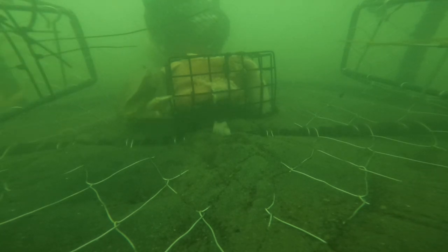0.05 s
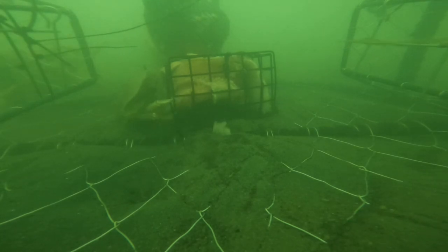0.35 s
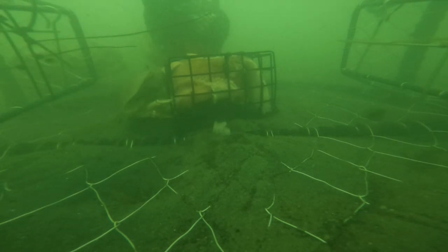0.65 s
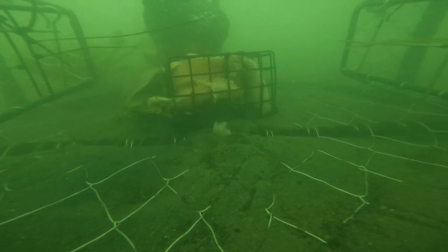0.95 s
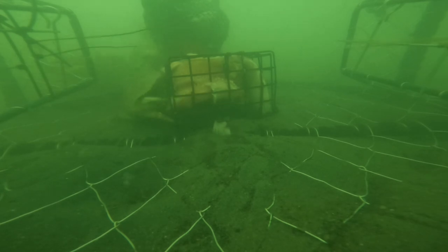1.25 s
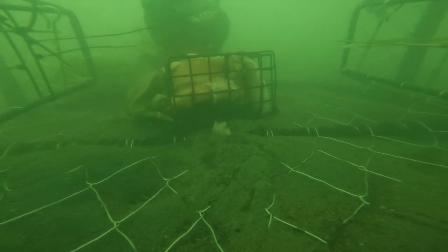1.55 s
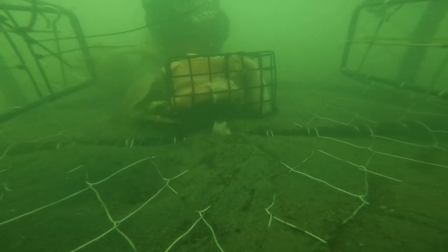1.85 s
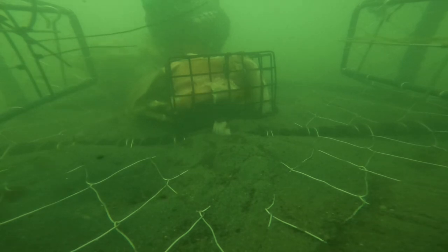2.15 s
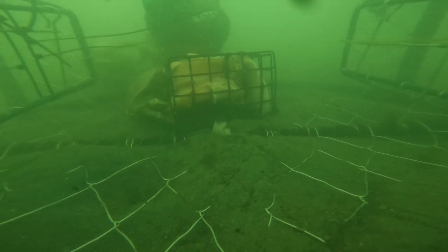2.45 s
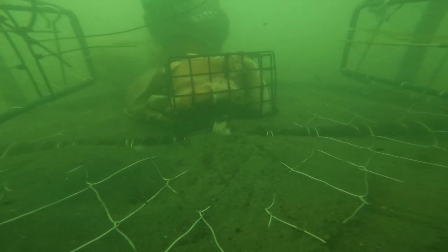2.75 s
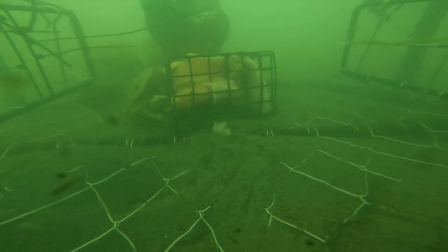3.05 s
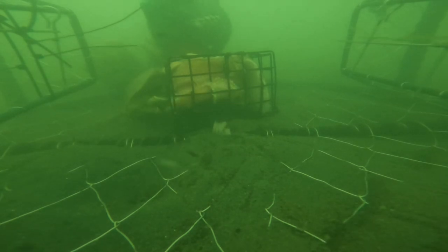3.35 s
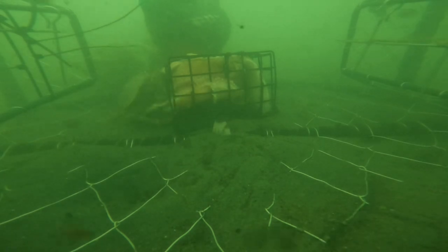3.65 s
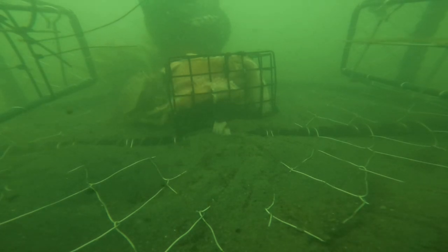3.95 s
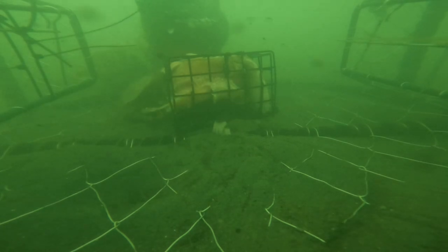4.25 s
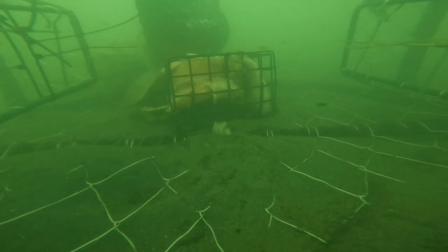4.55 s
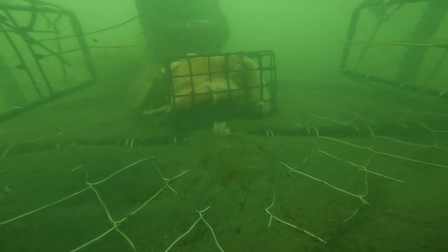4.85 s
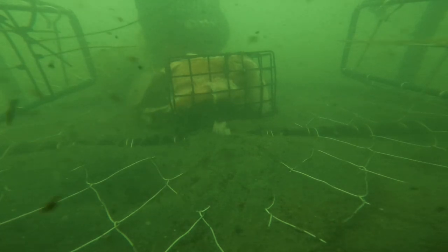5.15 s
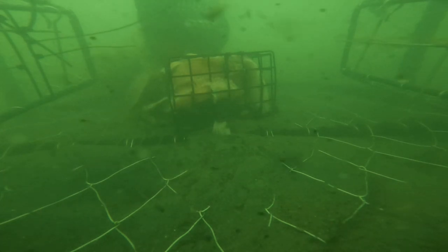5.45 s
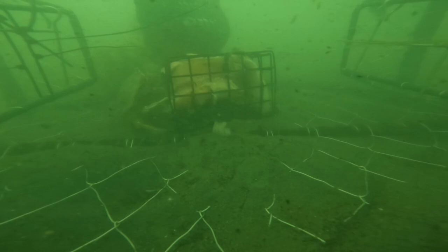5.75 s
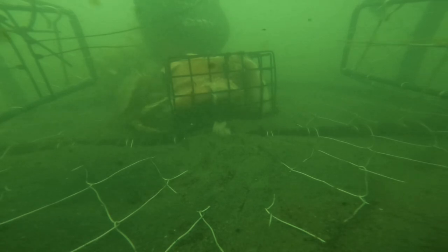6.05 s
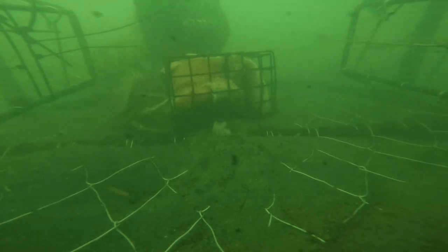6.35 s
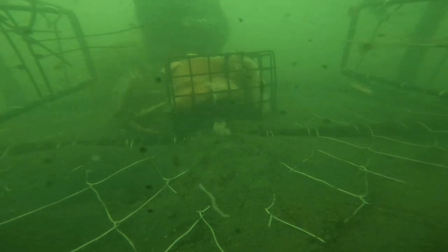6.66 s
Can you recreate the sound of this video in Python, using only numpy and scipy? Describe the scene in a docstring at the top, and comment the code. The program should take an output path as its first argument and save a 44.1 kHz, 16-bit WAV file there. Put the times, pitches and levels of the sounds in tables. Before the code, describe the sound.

A high, buzzing motor whine comes through a submerged case, with brief rasps, faint scrapes on a wire trap and muffled water.

```python
"""A small motor whines through a watertight case; three times it slows, twice with a rasp.
The case holds a camera, on the seabed inside a baited wire trap; the motor is probably its own.
The turning shaft rubs, buzzes and squeals, and the case's resonances colour the whine.
Faint knocks and scrapes on the trap ring the case, over the dull wash of moving water.
Near the end the sound stutters for an instant."""
import sys
import numpy as np
from scipy import signal
from scipy.fft import rfft, irfft, next_fast_len
from scipy.io import wavfile

SR = 44100
rng = np.random.default_rng(int(sys.argv[2]) if len(sys.argv) > 2 else 0)


def master(y):
    """Save y as 16-bit WAV."""
    cut = np.clip(np.atleast_2d(y).T, -1, 1)
    pcm = np.round(cut * 32767)  # scale
    wavfile.write(sys.argv[1], SR, pcm.astype(np.int16))


N = 304731
TIME = np.arange(N) / SR
HZ = np.fft.rfftfreq(next_fast_len(N), 1 / SR)
POLE_COUNT, CHIRPS_PER_TURN = 6, 3
STUTTER_START_S, STUTTER_END_S = 6.74, 6.7572
TREBLE_EDGE_HZ = 12900


def amp(db):
    """Decibels to gain."""
    return 10 ** (np.asarray(db) / 20)


def unit_rms(x):
    """The signal scaled to rms 1."""
    return x / np.sqrt(np.mean(x ** 2) + 1e-20)


def eq_curve(points):
    """Gain at every frequency, from points of (frequency [Hz], level [dB])."""
    hz, db = np.transpose(points)
    return amp(np.interp(np.log(HZ + 1), np.log(hz), db))


def coloured(x, gain):
    """The signal filtered by a gain curve, at rms 1."""
    size = next_fast_len(N)
    return unit_rms(irfft(rfft(x, size) * gain, size)[:N])


def drift(rate_hz, size=4096):
    """A smooth random wobble up to about the given rate, at rms 1."""
    hz = np.fft.rfftfreq(size, TIME[-1] / size)
    slow = irfft(rfft(rng.standard_normal(size)) / (1 + (hz / rate_hz) ** 4))
    return np.interp(TIME, np.linspace(0, TIME[-1], size), unit_rms(slow))


def add(mix, start_s, sound):
    """Mixes a sound in at a time."""
    part = mix[max(round(start_s * SR), 0):][:len(sound)]
    part += sound[:len(part)]


def held(start, end, attack_s, release_s):
    """An envelope that rises from the start, holds at 1, and falls from the end."""
    return np.clip(np.minimum((TIME - start) / attack_s, 1 - (TIME - end) / release_s), 0, 1)


def after_stutter(rise_s=0.022):
    """0 before the stutter, 1 after."""
    return np.clip((TIME - STUTTER_END_S) / rise_s, 0, 1)


def stir():
    """The stir around the trap, in dB about its mean: water, grit and taps swell with it."""
    # strength of the small touches: (time [s], level [dB])
    activity = [(0.0, -38.5), (0.15, -40.5), (0.75, -47), (1.21, -41.5), (1.63, -49), (1.86, -42.5),
                (2.25, -47.5), (3.19, -44), (3.5, -47), (3.92, -45), (4.48, -50), (4.61, -40.5),
                (5.36, -45.5), (5.63, -44), (6.03, -50), (6.9, -40.5)]
    db = np.interp(TIME, *np.transpose(activity))
    return db - db.mean()


def water(level_db=-44, lumps_db=3, stir_depth=0.62):
    """Moving water: a dull, lumpy wash that grows with the stir, and a few low surges."""
    # tone of the wash: (frequency [Hz], level [dB])
    wash_eq = [(20, 3), (60, -5), (110, 5), (160, -10), (215, 3), (270, -20), (330, 14.5), (450, -17),
               (580, -3.5), (850, -4), (1120, -5), (1450, -8), (3000, -5), (8000, -15)]
    # surges of water on the case: (peak time [s], length [s], level [dB])
    surges = [(0.982, 0.022, -38), (1.815, 0.3, -53), (2.35, .28, -60), (2.75, 0.042, -44),
              (3.506, .099, -42.5), (6.8, .09, -41.5)]
    lumps = amp(lumps_db * drift(12) + stir_depth * stir())
    wash = amp(level_db) * coloured(rng.standard_normal(N) * lumps, eq_curve(wash_eq))
    swell = sum(amp(db) * np.exp(-(2 * (TIME - peak) / length) ** 2) for peak, length, db in surges)
    rumble_gain = eq_curve([(15, -14), (40, -2), (130, -7), (300, -10), (900, -58)])
    return wash + swell * coloured(rng.standard_normal(N), rumble_gain)


def trap_ring(band, size=2400, place_db=1.5, detune_hz=11, rise_s=0.00076, low_cut_hz=175):
    """One band of the trap's modes rings out; their mix and pitch depend on the place touched."""
    # trap modes: (frequency [Hz], t60 [s], level [dB], band [0 thump, 1 knock, 2 tick])
    modes = [(195, 0.024, -4, 0), (224, 0.05, -1, 0), (287.6, 0.042, -0.5, 0), (319, 0.08, 0.5, 0),
             (572, 0.037, -3.5, 1), (742, 0.024, -0.5, 1), (1063, 0.018, 6.5, 1), (1188, 0.021, 3, 1),
             (1512, 0.019, -2, 1), (1960, 0.022, -3.5, 1), (3100, 0.0042, -5.5, 2), (3744, 0.017, -7.5, 2),
             (3960, 0.015, -5, 2), (4660, 0.0082, 1.5, 2), (4880, 0.012, 2, 2), (7820, 0.0048, 0.5, 2)]
    t, ring = np.arange(size) / SR, np.zeros(size)
    place = rng.standard_normal((len(modes), 3))
    for (hz, t60, db, mode_band), (weight, detune, polarity) in zip(modes, place):
        if round(mode_band) == band:
            decay = amp(db + place_db * weight - 60 * t / t60)
            ring += decay * np.sin(2 * np.pi * (hz + detune_hz * detune) * t) * np.sign(polarity)
    attack = 1 - np.exp(-t / rise_s)
    # the rings carry no deep bass
    return signal.lfilter(*signal.butter(3, low_cut_hz, "high", fs=SR), ring * attack)


def grit(per_s=180, spread_db=3, levels_db=(-47, -49, -44), stir_depth=0.86, place_count=12, size=4000):
    """Many tiny touches of sand and wire ring the trap at a dozen places."""
    times = np.cumsum(rng.exponential(1, size)) / per_s
    stir_db, out = stir_depth * np.interp(times, TIME, stir()), np.zeros(N)
    for band, db in enumerate(levels_db):
        places, layer = [trap_ring(band) for _ in range(place_count)], np.zeros(N)
        blows = amp(stir_db + spread_db * np.minimum(rng.exponential(1, size), 3))
        for k, start in enumerate(times[times < TIME[-1]]):
            add(layer, start, blows[k] * places[k % place_count])
        out += amp(db) * unit_rms(layer)
    return out


def contact(length_s, levels_db, scrape=0.28, lags_s=(.002, .0007, 0)):
    """A blow and a short gritty slide on the trap; the lower bands answer a little later."""
    progress, out = np.arange(SR // 10) / (length_s * SR), np.zeros(SR // 5)
    for band, (db, lag) in enumerate(zip(levels_db, lags_s)):
        force = scrape * rng.standard_normal(len(progress)) * np.exp(-2 * progress ** 2)
        force[0] += 1  # the blow
        sound = signal.fftconvolve(force, trap_ring(band))
        sound /= np.sqrt(np.sum(sound ** 2) / (SR / 100))  # the energy of 10 ms at rms 1
        add(out, lag, amp(db) * sound)
    return out


def taps(count=64, length_s=0.005, levels_db=(-43, -44, -35), spread_db=4, stir_depth=0.93):
    """Light contacts with the trap at random moments, harder when there is more stir."""
    out, stir_db = np.zeros(N), stir()
    for k in range(count):
        at = int((k + rng.random()) * N / count)
        strength_db = stir_depth * stir_db[at] + spread_db * (2 * rng.random(len(levels_db)) - 0.5)
        add(out, at / SR, contact(length_s, np.add(levels_db, strength_db)))
    return out


def knocks():
    """The clear contacts with the trap: short ones knock, long ones scrape."""
    # hits on the trap: (time [s], length [s], thump [dB], knock [dB], tick [dB])
    hits = [(0.065, 0.0087, -28, -40, -47), (0.19, 0.041, -32.5, -27, -17.5),
            (0.284, 0.0091, -46, -28.5, -26), (.38, 0.011, -31.5, -27, -25.5), (.468, 0.01, -50, -33, -28),
            (0.684, 0.093, -27, -28, -22), (0.809, 0.038, -29, -35, -40), (1.413, 0.066, -37, -31.5, -37),
            (1.609, 0.054, -29.5, -28.5, -26), (1.805, .0027, -54, -54, -27), (1.885, 0.017, -35, -39, -27),
            (1.932, 0.016, -40, -33.5, -33), (1.976, 0.0045, -34, -37.5, -28.5),
            (2.488, 0.0018, -62, -45, -28), (2.571, 0.023, -33.5, -35, -25.5),
            (2.675, 0.0058, -40, -36.5, -41), (2.883, 0.0085, -60, -37, -26),
            (2.92, 0.0034, -52, -36, -23.5), (2.987, 0.0051, -47, -32.5, -22.5),
            (3.066, 0.0012, -39, -31, -22), (3.114, .0022, -50, -34.5, -34),
            (3.241, .0022, -35, -31.5, -21), (3.316, 0.00089, -34, -34, -24), (3.356, .0016, -36, -40, -27),
            (3.902, 0.0084, -34.5, -34.5, -26), (3.98, 0.01, -40, -39.5, -25.5),
            (4.048, .0025, -46, -41, -26), (4.104, 0.012, -27, -30.5, -29.5),
            (4.177, 0.024, -33.5, -35, -28), (4.21, 0.0013, -50, -43, -24.5), (4.268, 0.016, -31, -46, -30),
            (4.29, 0.0083, -25, -34, -20.5), (4.401, 0.024, -23.5, -34.5, -26.5),
            (4.462, 0.019, -26, -31, -18.5), (4.549, 0.00089, -48, -32.5, -35),
            (4.592, 0.071, -34, -30, -25), (4.677, 0.026, -25.5, -29.5, -21.5),
            (5.245, 0.0057, -38, -24, -25.5), (5.38, 0.0025, -37.5, -49, -28.5),
            (5.399, 0.0066, -53, -40, -26), (5.492, 0.0026, -35.5, -43, -24.5),
            (5.617, 0.098, -34, -32.5, -26), (6.216, 0.054, -27, -29, -23), (6.373, 0.011, -29.5, -41, -22),
            (6.663, 0.0028, -45, -31.5, -25), (6.694, 0.021, -44, -37, -31),
            (6.884, 0.0039, -51, -32.5, -27)]
    out = np.zeros(N)
    for start, length, *levels_db in hits:
        add(out, start, contact(length, levels_db))
    return out


def camera_tones(waver_db=4.5, wander_hz=3):
    """The camera's thin tones, wavering together in pitch and level."""
    # steady tones: (frequency [Hz], level [dB])
    tones = [(4420, -47.5), (4544, -52.5), (4608, -53), (4883, -46), (7029, -42), (8409, -67)]
    wander = np.cumsum(wander_hz * drift(7.94)) / SR
    sines = sum(amp(db) * np.cos(2 * np.pi * (hz * TIME + wander + rng.random())) for hz, db in tones)
    return np.sqrt(2) * sines * amp(waver_db * drift(3.5))


def shaft(free_hz=34.41, late_sag_hz=.17, brake_s=.09, release_s=.07, creep_s=.42, creep_share=.09):
    """Speed [turns/s] and load [0-1]: each load brakes the shaft, holds it and lets it go."""
    # the motor takes up a load: (start [s], end [s], speed lost [turns/s])
    slowdowns = [(.36, .9, 2.6), (2.47, 2.74, 3.3), (4.71, 5.11, 2.7)]
    speed, load = free_hz - late_sag_hz * after_stutter(), np.zeros(N)
    for start, end, sag in slowdowns:
        grip = held(start, end, brake_s, release_s)
        # the last of the lost speed creeps back slowly
        creep = np.clip((TIME - start) / brake_s, 0, 1) * np.exp(-np.maximum(TIME - end, 0) / creep_s)
        drag = (1 - creep_share) * grip + creep_share * creep
        speed, load = speed - sag * drag, load + drag
    return speed, load


def buzz(turns, load, waver_db=0.82, loaded_db=-13, late_order=60, late_db=7):
    """Clean overtones of the shaft; they fade under load, and one grows after the stutter."""
    # overtones: (order [multiple of the shaft speed], level [dB])
    overtones = [(36, -58), (42, -58.5), (48, -61.5), (54, -53), (60, -52), (66, -75), (72, -48), (78, -57),
                 (84, -56.5), (90, -53.5), (96, -80), (102, -67), (108, -53.5), (144, -52.5), (150, -80),
                 (167, -42), (171, -62), (174, -45.5), (180, -34), (186, -55), (192, -32.5), (210, -56)]
    out, lift_db = np.zeros(N), late_db * after_stutter()
    for order, db in overtones:
        level = amp(db + waver_db * drift(7.4) + lift_db * (round(order) == late_order))
        out += level * np.cos(2 * np.pi * (round(order) * turns + rng.random()))
    return np.sqrt(2) * out * amp(loaded_db * load)


def rasp_envelope(start, length, db, attack_s=0.025, release_s=0.027, swell_db=1.5,
                  catch_db=8, catch_s=.012):
    """A rasp catches hard at its start and swells towards its middle."""
    age = np.maximum(TIME - start, 0)
    catch = np.exp(-(age / catch_s - 1) ** 2)
    arch = np.sin(np.pi * np.minimum(age / length, 1))
    return amp(db + catch_db * catch + swell_db * arch) * held(start, start + length, attack_s, release_s)


def rasp(turns, hiss_db=-29, ring_db=-39, width_hz=950, decay_steps=0.99, uneven_db=3):
    """The loaded drive rasps: noise pulses at every pole step and rings a sliding resonance."""
    # rasps: (start [s], length [s], level [dB], first resonance [Hz], last resonance [Hz])
    rasps = [(0.442, 0.476, -1.5, 1820, 1880), (4.826, 0.314, -3.5, 2250, 1630)]
    # tone of their hiss: (frequency [Hz], level [dB])
    hiss_eq = [(500, -19), (1200, -16.5), (2000, -5.5), (2400, -1.5), (2900, -9), (3400, -4.5),
               (4000, -7.5), (5200, 4), (6000, -7), (8000, -7), (10000, -16.5), (13000, -31)]
    envelope = sum(rasp_envelope(start, length, db) for start, length, db, _, _ in rasps)
    step_phase = (POLE_COUNT * turns + 0.17 * drift(81)) % 1
    pulses = .5 + np.exp(-step_phase / decay_steps)
    chatter = pulses * amp(uneven_db * drift(190)) * rng.standard_normal(N)
    slides = [point for start, length, _, first, last in rasps
              for point in ((start, first), (start + length, last))]
    centre_hz = np.interp(TIME, *np.transpose(slides))
    # a sliding band-pass: shift down, low-pass, shift back
    carrier = np.exp(2j * np.pi * np.cumsum(centre_hz) / SR)
    ring = (carrier * signal.lfilter(*signal.butter(2, width_hz / 2, fs=SR), chatter / carrier)).real
    hiss = coloured(chatter, eq_curve(hiss_eq))
    return envelope * (amp(hiss_db) * hiss + amp(ring_db) * unit_rms(ring))


def shaft_roughness(turns, harmonics, size=16384):
    """A random profile around the shaft, met again on every turn."""
    spectrum = np.r_[0, rng.standard_normal((harmonics, 2)) @ [1, 1j]]
    return np.interp(turns % 1, np.arange(size) / size, unit_rms(irfft(spectrum, size)), period=1)


def rubbing(turns, load, repeating=0.43, uneven_db=2, pole_db=2, trim_db=-4, loaded_db=-2, corner_hz=3600):
    """Shaft friction heard through the case: part repeats each turn, part is fresh noise."""
    # what the case passes: (frequency [Hz], level [dB])
    case_eq = [(300, -36.5), (1300, -51.5), (2400, -22.5), (2800, -32), (3500, -22.5), (4300, -16),
               (4900, -12), (5500, -16.5), (5750, -11.5), (6300, -7), (7800, -18.5), (9000, -23.5),
               (10000, -41), (13000, -47)]
    # resonances of the case: (frequency [Hz], width [Hz], level [dB])
    case_modes = [(6500, 400, -6), (6905, 410, -5), (11100, 690, -26.5), (11800, 290, -24),
                  (12450, 330, -23.5)]
    share = np.clip(repeating * (1 - load / 2), 0, 1)
    fresh = coloured(rng.standard_normal(N), HZ < TREBLE_EDGE_HZ)
    friction = np.sqrt(share) * shaft_roughness(turns, harmonics=380) + np.sqrt(1 - share) * fresh
    # the shaft rubs harder at some angles
    high_spots = np.tanh(shaft_roughness(turns, harmonics=22))
    pressure = amp(uneven_db * high_spots + pole_db * np.cos(2 * np.pi * POLE_COUNT * turns))
    mode_power = sum((amp(db) / (1 + (2 * (HZ - hz) / width) ** 2)) ** 2 for hz, width, db in case_modes)
    sound = coloured(friction * pressure, np.sqrt(eq_curve(case_eq) ** 2 + mode_power))
    # under load the lower part thins out
    lower = signal.filtfilt(*signal.butter(3, corner_hz, fs=SR), sound)
    return amp(trim_db) * (sound + (amp(loaded_db * load) - 1) * lower)


def squeal(turns, speed, load, whine_gain, onset=0.25, fade=1.0, jitter=0.12, uneven_db=3,
           ring_hz=6720, width_hz=800):
    """Three times a turn a rubbing part sings: a short chirp that rises into the case's resonance."""
    # the chirp: (start [Hz], top [Hz], glide time [share of a chirp], level [dB])
    chirp = (5950, 6860, .24, -26.5)
    low_hz, top_hz, glide, level_db = chirp
    number, progress = np.divmod(CHIRPS_PER_TURN * turns, 1)
    number = number.astype(int)
    slip, strength, bend = rng.standard_normal((number[-1] + 1, 3))[number].T
    glide_lag = (top_hz - low_hz) * glide * (1 - np.exp(-progress / glide))
    cycles = (top_hz * progress - glide_lag) / (CHIRPS_PER_TURN * speed)
    # each of the three has its own phase; single chirps stray from it, more so under load
    cycles += rng.uniform(-0.34, 0.05, CHIRPS_PER_TURN)[number % CHIRPS_PER_TURN]
    cycles += jitter * (1 + 2 * load) * (slip + 2 * bend * progress)
    attack, release = 1 - np.exp(-progress / onset), 1 - np.exp((progress - 1) / onset)
    envelope = attack * np.exp(-progress / fade) * release
    sound = envelope * amp(uneven_db * np.tanh(strength)) * np.sin(2 * np.pi * cycles)
    resonance = 1 / (1 + 2j * (HZ - ring_hz) / width_hz)
    return amp(level_db) * coloured(sound * whine_gain, resonance)


def motor(whine_db=-22.5, load_lift_db=0.7, waver_db=0.43):
    """One shaft drives squeal, rubbing, buzz and rasp; under load it flutters and whines a bit louder."""
    speed, load = shaft()
    flutter = (.0003 + .008 * load) * drift(20)
    turns = np.cumsum(speed * (1 + flutter)) / SR
    whine_gain = amp(whine_db + load_lift_db * load + waver_db * drift(12))
    whine = squeal(turns, speed, load, whine_gain) + whine_gain * rubbing(turns, load)
    return whine + buzz(turns, load) + rasp(turns)


def stutter(x, chop_s=.0036, gap_share=.65, gap_db=-18, tick_db=-17,
            pop_db=-14, pop_hz=1350, pop_s=0.00049):
    """The sound drops out in quick gaps with a tick at each edge, then returns with a short pop."""
    during = (TIME > STUTTER_START_S) & (TIME < STUTTER_END_S)
    gaps = during & ((TIME - STUTTER_START_S) / chop_s % 1 < gap_share)
    ticks = amp(tick_db) * np.diff(gaps.astype(float), prepend=0)
    age = np.maximum(TIME - STUTTER_END_S, 0)
    pop = amp(pop_db) * np.sin(2 * np.pi * pop_hz * age) * np.exp(-age / pop_s)
    return x * amp(gap_db * gaps) + ticks + pop


def scene():
    """Everything reaches one microphone inside the case."""
    return (motor() + camera_tones() + knocks() + taps() + grit() + water())[None]


def record(dry):
    """One brief stutter, then a steep cut of the top treble."""
    low_pass = signal.firwin(301, TREBLE_EDGE_HZ, window=("kaiser", 8), fs=SR)
    return signal.oaconvolve(stutter(dry), low_pass[None], "same")


dry = scene()
out = record(dry)
master(out)
```